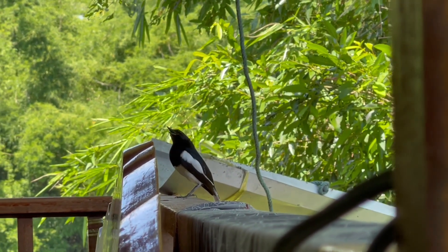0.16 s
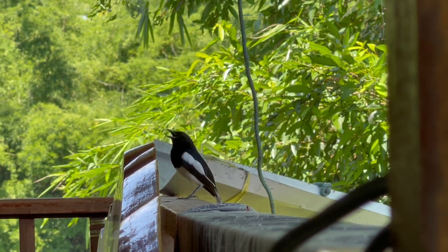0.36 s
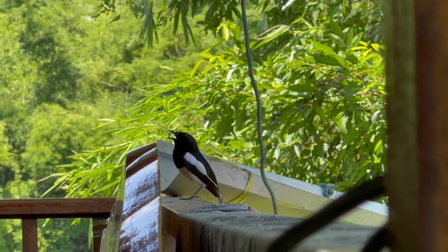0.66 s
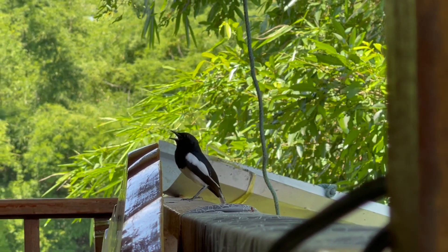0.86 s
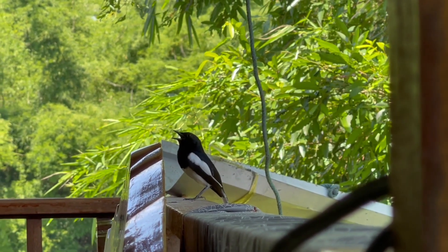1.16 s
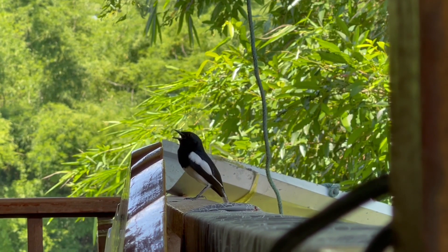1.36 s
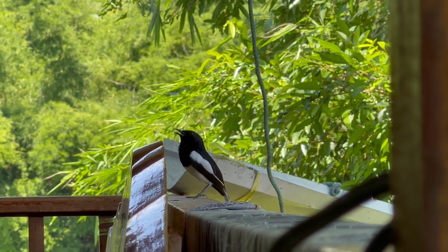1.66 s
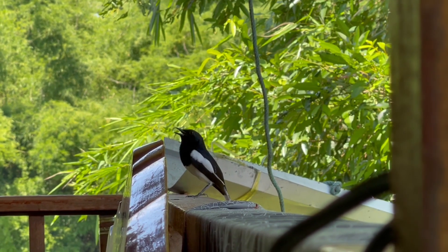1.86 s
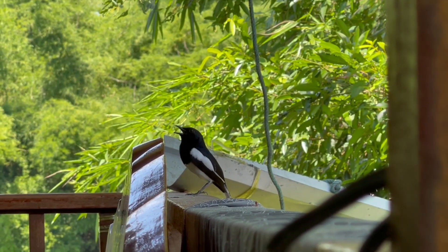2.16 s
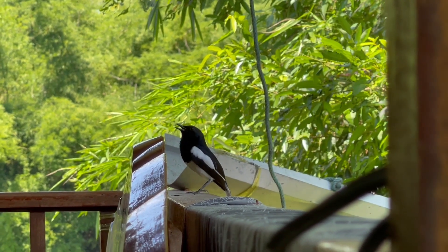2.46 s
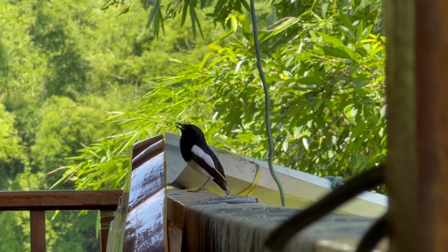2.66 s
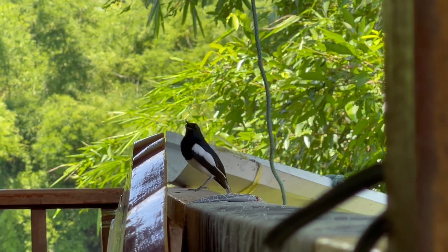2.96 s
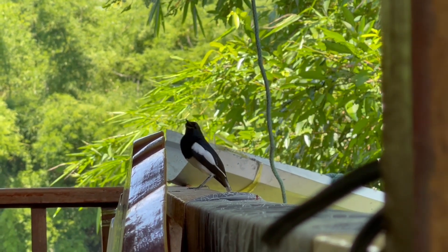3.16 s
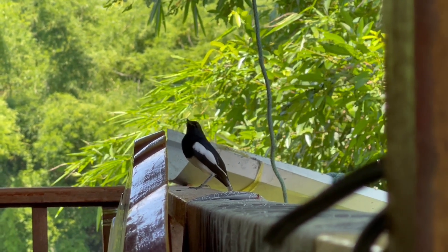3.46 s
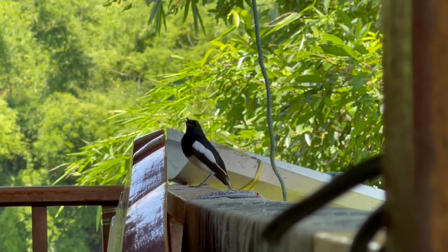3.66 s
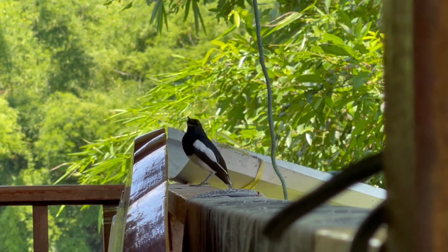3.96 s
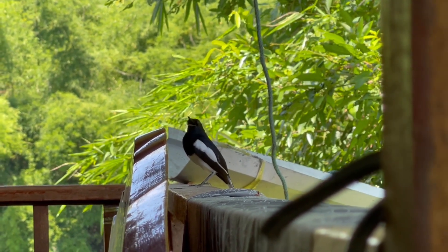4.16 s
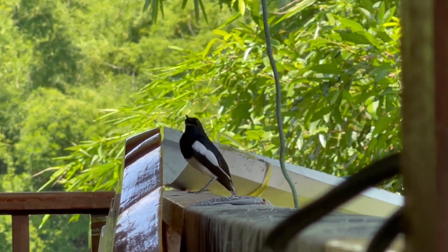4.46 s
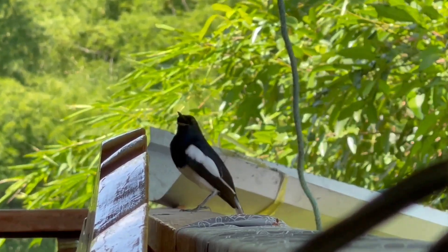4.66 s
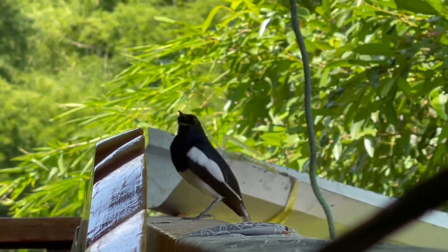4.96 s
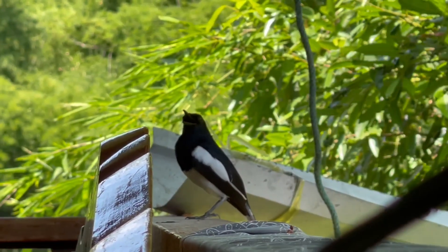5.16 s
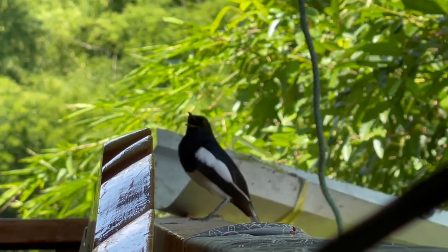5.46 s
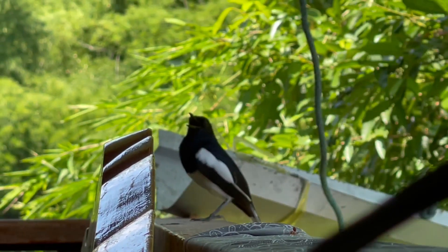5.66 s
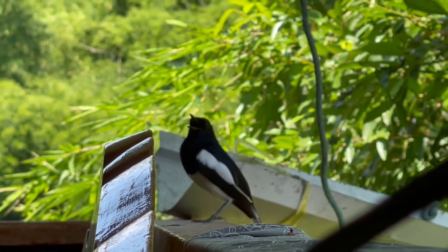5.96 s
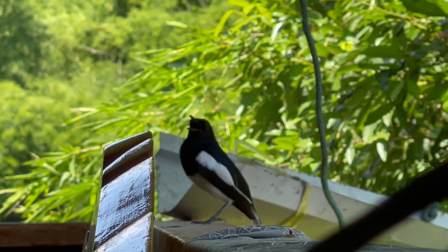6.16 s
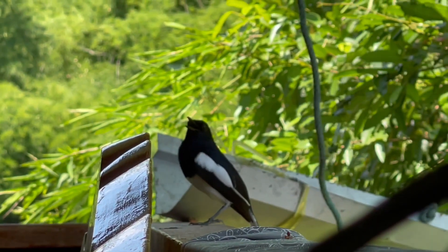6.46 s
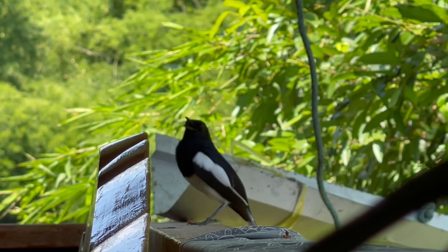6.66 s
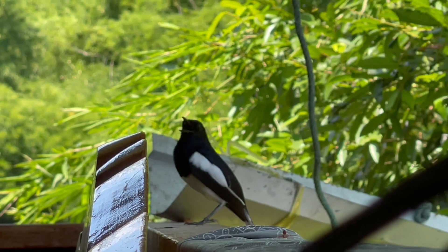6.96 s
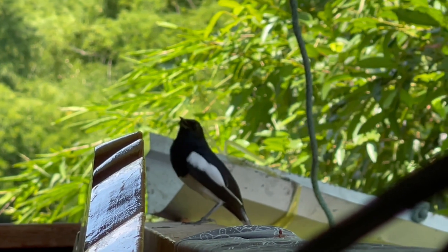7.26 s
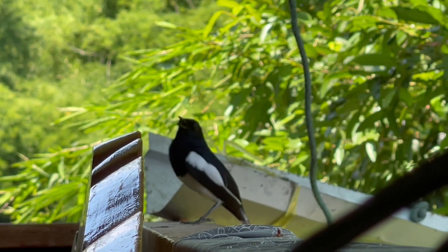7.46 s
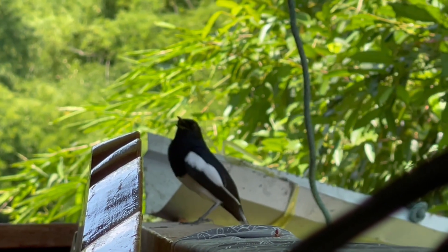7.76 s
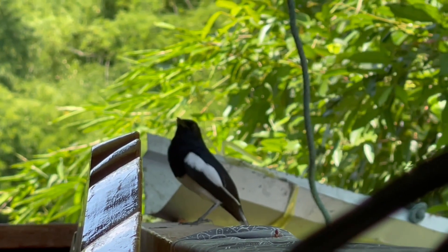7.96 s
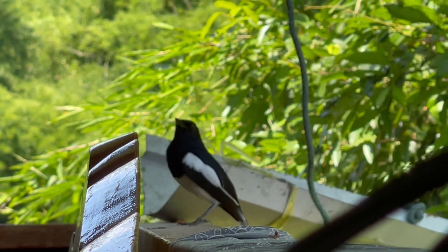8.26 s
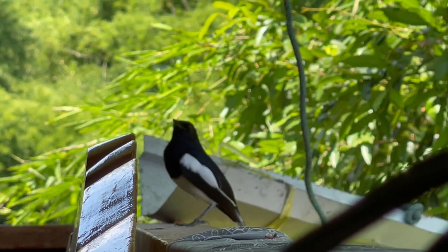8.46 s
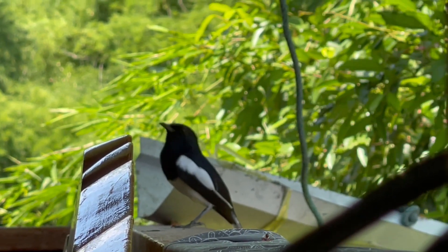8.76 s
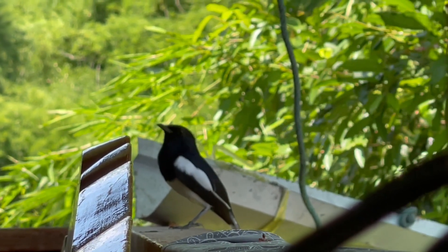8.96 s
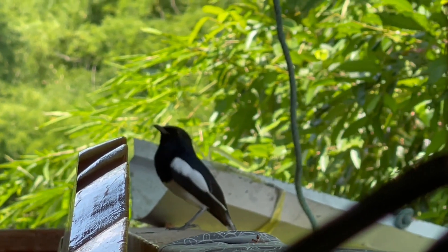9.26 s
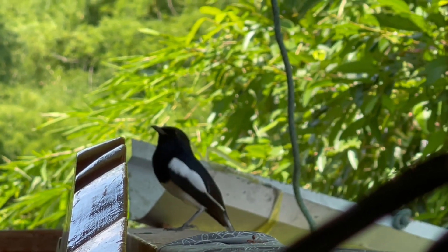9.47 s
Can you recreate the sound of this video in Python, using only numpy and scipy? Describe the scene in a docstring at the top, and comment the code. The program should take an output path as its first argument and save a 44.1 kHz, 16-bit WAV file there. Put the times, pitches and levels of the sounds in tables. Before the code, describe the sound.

Close outdoor songbird: two lively strings of clear high whistles, each about two seconds, separated by quiet air, far bird calls and small knocks.

```python
"""On a veranda rail at the forest's edge, a magpie-robin sings a phrase of ten kinds of note, then repeats it.
Each note is one gliding tone with weak overtones, here and there a rasp; boards and roof throw it back.
Far birds are noise-fluttered tones smeared by the trees, and knocks are short bursts of filtered noise.
Shaped noise makes the low rumble, rustle and thin hiss; a wavering sine makes the faint hum.
"""
import sys
import numpy as np
from scipy import signal
from scipy.fft import rfft, irfft
from scipy.io import wavfile
from scipy.ndimage import uniform_filter1d

SR = 44100
rng = np.random.default_rng(int(sys.argv[2]) if len(sys.argv) > 2 else 0)


def unload_audio(sound):
    """Save the sound as a 16-bit wav file, at the path given as the first command line argument."""
    columns = np.transpose(np.atleast_2d(sound))
    # keep every value between -1 and 1, then stretch to whole-number steps
    steps = np.round(np.clip(columns, -1, 1) * 32767)
    wavfile.write(sys.argv[1], SR, steps.astype(np.int16))


N = 423360
TIME = np.arange(N) / SR
FREQS = np.arange(N // 2 + 1) * SR / N

# outdoor air before the rustle and the lean to the left: (frequency [Hz], density [dB per Hz])
AIR_SPECTRUM = [(27, -110), (37, -77.5), (60, -78), (110, -83.5), (170, -86), (300, -96), (500, -100),
                (900, -102), (1600, -106), (3800, -108.5), (7300, -102), (9200, -105), (11500, -114),
                (12800, -138)]
# mains hum before the lean to the left: (time [s], level [dB])
HUM_LEVELS = [(0, -66), (5.3, -67.5), (6.1, -62.5), (9.6, -61.5)]
# soft knocks, brief rustles and a tick close by, as noise before its decay:
# (time [s], level [dB], centre [Hz], width [octaves], decay [s])
KNOCKS = [(.305, -58, 1070, 0.46, 0.019), (3.272, -43, 77.6, 1.43, 0.021), (3.272, -53, 464, .6, 0.0084),
          (3.959, -56, 477, 0.48, .015), (3.995, -63.5, 1600, 2.6, 0.1), (4.084, -63, 3200, 0.76, 0.031),
          (4.585, -66.5, 1810, 1.8, 0.12), (5.48, -68.5, 2400, 0.62, 0.18), (5.526, -52, 5000, 2.7, .005)]
# far bird chattering in pairs of falling buzzes: (time [s], first pitch [Hz], level of the first buzz [dB])
CHATTER_PAIRS = [(.01, 4240, -66.5), (.225, 4540, -65.5), (.46, 3820, -67), (.69, 4530, -64.5),
                 (.92, 3690, -68.5)]
# single calls in the forest, before the trees add their reflections:
# (time [s], length [s], first pitch [Hz], last pitch [Hz], level [dB], buzz [0-1])
FAR_CALLS = [(0.0, 0.5, 1744, 1699, -72.5, 0.27), (3.311, 0.063, 1426, 1363, -72, 0),
             (4.158, 0.096, 1987, 1826, -69.5, 0.16), (4.327, .02, 4120, 4320, -68, 0.4),
             (4.37, 0.023, 4150, 4700, -64, 0.3), (4.642, 0.076, 5600, 4440, -64, .7),
             (4.663, 0.054, 3750, 3330, -66, 0.75), (4.669, 0.084, 2436, 2320, -70.5, 0.7),
             (4.987, 0.072, 3580, 3260, -71, .28), (5.056, .13, 3007, 2593, -66, 0.98),
             (5.562, .1, 3440, 3440, -65, 0.07), (5.562, .098, 4650, 4560, -73, .1),
             (5.695, 0.076, 3515, 3480, -63, 0.26), (5.755, .17, 3260, 3090, -68.5, 0.16),
             (8.465, 0.053, 3600, 3820, -69.5, 0.33), (8.699, 0.23, 3250, 3250, -74, 0.1),
             (8.863, 0.09, 3420, 3140, -67, 0.05), (8.862, 0.085, 2540, 2310, -71.5, 0.3),
             (8.845, 0.13, 4430, 4510, -71.5, .1), (9.131, 0.078, 3930, 4650, -66, 1)]
# the bird's repertoire, one gesture for each kind of note, before the phrase reshapes it:
# name: (time into the note [s], pitch [Hz], level [dB], octave overtone relative to the tone [dB])
NOTE_GESTURES = { "fall": [(0, 4220, -53, -14), (.033, 4554, -43.5, -8.5), (.067, 4280, -38.5, -14.5),
                 (.106, 4043, -40, -20), (.128, 3965, -56, -13), (.161, 3926, -29.5, -23),
                 (.228, 3880, -36, -15), (.272, 3270, -44.5, -10.5), (.282, 3244, -43, -8)],
                 "upslur": [(0.0, 2575, -59.9, -17), (0.027, 2987, -41.6, -11.5),
                 (0.085, 3153, -39.8, -8.5), (0.102, 3347, -30.5, -26), (0.124, 3502.0, -39.5, -12),
                 (0.134, 3490, -34, -31.0)], "scoop": [(0.0, 2746, -53, -12), (0.027, 2847, -40, -8.5),
                 (0.045, 2950, -47, 1.5), (0.065, 3000, -38.5, -8.5), (0.085, 3475.0, -32, -22),
                 (0.098, 3575, -36, -20), (0.103, 3940, -45, -25)], "swoop": [(0, 5190, -46, -21),
                 (.02, 4774, -36, -9), (.04, 4637, -34, -5.5), (.069, 5214, -30.5, -3),
                 (.096, 5358, -31, 1), (.118, 5335, -29.5, -9), (.171, 5660, -32, -9.5),
                 (.186, 5244, -40, -17)], "warble": [(0, 2590, -58, -20), (.015, 2980, -42, -3.5),
                 (.032, 3170, -33.5, -16), (.056, 2816, -35.5, -16), (.068, 2981, -36.5, -16),
                 (.156, 2966, -39.5, -13), (.175, 3050, -37, -11), (.2, 2982, -37.5, -15.5),
                 (.21, 2650, -53, -15)], "burr": [(0.0, 3080, -39.5, -21), (0.016, 3493, -31.5, -16.5),
                 (0.035, 3274, -28, -22.0), (0.062, 3227, -28.5, -26.0), (0.069, 3106.0, -40, -15),
                 (0.1, 3199.0, -42.5, -11.5), (0.174, 3105.0, -33.5, -16.5), (0.192, 2900, -45.5, -4)],
                 "sag": [(0, 3245, -59, -25), (.016, 3423, -44, -30), (.039, 3324, -27, -22),
                 (.082, 3030, -38, -11.5), (.096, 3105, -37, -31.5), (.136, 2966, -39.5, -12.5),
                 (.151, 3000, -35.5, -26)], "whip": [(0, 5370, -49, -13), (.012, 5290, -48, -5),
                 (.019, 5156, -27, -34), (.028, 4815, -26, -14.5), (.043, 4460, -23, -16.5),
                 (.064, 4045, -26, -24), (.076, 2950, -50.5, -4)], "lift": [(0, 3500, -58, -27),
                 (.014, 3399, -44, -14.5), (.066, 3487, -34.5, -4), (.082, 3700, -31.5, -11),
                 (.098, 4070, -32, -25), (.111, 4187, -32, -17.5), (.119, 4100, -53, -21)],
                 "arch": [(0.0, 1785, -61.5, -8), (0.039, 2340, -36.5, -27), (0.052, 2430, -38.5, -17),
                 (0.073, 2540, -31.5, -23.5), (0.093, 2552, -29.5, -24), (0.101, 2457.0, -38.5, -23),
                 (0.111, 2340, -32.5, -18.5), (0.128, 2050.0, -51, -13)], }
# the phrase, sung twice, the second time without the burr:
# (start [s], note [name], length [factor], pitch [factor], level change [dB], overtone change [dB])
PHRASES = [ (1.076, "fall", .95, 1.002, -2, -1), (1.4241, "upslur", 1, 0.99, -1.5, -2),
           (1.5675, "scoop", 0.96, 1, -1.9, .5), (1.7729, "swoop", 0.95, 0.99, -1.5, -2),
           (2.0366, "warble", 1, .993, -1.4, 1.5), (2.321, "burr", 0.98, 1, -1.05, -0.1),
           (2.6143, "sag", 0.99, 1.001, -1.4, 2.5), (2.7778, "whip", .994, 1.004, -1.8, 2),
           (2.9323, "lift", .966, 1, 0.3, -0.5), (3.1418, "arch", 0.96, 1.016, -2.3, -1),
           (6.0073, "fall", .994, 1.002, 2.3, -2.5), (6.371, "upslur", 0.95, 0.98, .5, -3),
           (6.509, "scoop", 1.033, 1.003, 0.5, -3), (6.7208, "swoop", 0.93, 0.99, -0.4, -2.5),
           (6.9798, "warble", 1.02, 0.99, 0.7, -0.8), (7.2865, "sag", 1.01, .99, 0.2, -1),
           (7.455, "whip", 1, 0.99, -2.8, 1.5), (7.5934, "lift", 1.013, 0.99, 1.5, -4.5),
           (7.7848, "arch", 1, 1.004, -1.8, -3)]
# quick tremor on the level notes: (start [s], end [s], rate [Hz], pitch swing [share of pitch])
TREMORS = [(2.077, 2.205, 46.8, 0.014), (2.399, 2.49, 60.4, 0.015), (7.032, 7.146, 47.66, 0.017),
           (7.376, 7.42, 60.6, 0.0085)]
# how throat and open beak pass the third and fourth partials: (frequency [Hz], gain [dB])
BEAK_RESPONSE = [(6000, -12), (7600, 4), (9000, -4.5), (10500, 5.5), (11800, -12), (12700, -4),
                 (13400, -20), (15600, -25.5)]
# moments where the voice turns rough: (time [s], half length [s], added depth [factor])
RASPS = [(1.557, 0.0074, 0.28), (1.67, 0.016, 0.2), (2.425, 0.022, 0.83), (2.455, 0.022, 0.17),
         (2.704, 0.0074, 0.32), (2.786, 0.0051, 0.39), (6.499, 0.0047, 0.18), (7.117, 0.0059, 0.28),
         (7.391, 0.011, 0.29)]
# echoes from rail, gutter and roof: (delay [ms], gain [factor])
ECHOES = [(2.69, 0.21), (3.78, 0.17), (5.2, 0.05), (6.27, 0.21), (8.22, 0.51), (8.38, 0.23), (15.75, 0.043),
          (15.86, 0.19), (15.95, 0.26), (17.22, 0.14)]
# phase lead of the left microphone port over the right: (frequency [Hz], lead [radians])
PORT_LEAD = [(0, 0), (1900, 0), (2700, .6), (5000, .58), (7100, 0), (7700, .5), (8700, 0), (9400, -1.8),
             (10300, -3.1), (12000, -6.2), (16000, -12.6)]


def undb(db):
    """Decibels to gain."""
    return 10 ** (np.asarray(db) / 20)


def noise(gain):
    """Noise of rms 1 with the given gain at each frequency."""
    x = irfft(rfft(rng.standard_normal(N)) * gain, N)
    return x / x.std()


def wander(rate_hz):
    """Random motion of rms 1, mostly slower than the rate."""
    return noise(1 / (1 + (FREQS / rate_hz) ** 4))


def gate(t, start, end, edge):
    """Opens and closes smoothly around the two times."""
    opening = np.clip(np.minimum(t - start, end - t) / edge + .5, 0, 1)
    return np.sin(np.pi / 2 * opening) ** 2


def tail(t60, build_s):
    """Diffuse reflections of unit energy: noise that builds up and dies away exponentially."""
    t = TIME[:2 * SR]
    decay = np.exp(-np.log(1000) * t / t60)
    h = rng.standard_normal(len(t)) * decay * (1 - np.exp(-(t / build_s) ** 2))
    return h / np.sqrt(np.sum(h ** 2))


def reverberate(x, response):
    """The sound after a set of reflections."""
    return signal.fftconvolve(x, response)[:N]


def mains_hum(hum_hz=100, waver_hz=.23):
    """One sine whose pitch wavers slightly while its level drifts."""
    phase = 2 * np.pi * np.cumsum(hum_hz + waver_hz * wander(1.53)) / SR
    return np.sqrt(2) * undb(np.interp(TIME, *np.transpose(HUM_LEVELS))) * np.sin(phase)


def valley_rustle(air, rustle_db=2.05, ease_db_per_s=.36, stir_db=.7):
    """Change to the air's middle band as the valley rustle eases off steadily and stirs at random."""
    band = signal.butter(2, [300, 2500], "band", fs=SR, output="sos")
    middle = signal.sosfiltfilt(band, air)
    level_db = rustle_db - ease_db_per_s * TIME + stir_db * wander(12)
    return middle * (undb(level_db) - 1)  # minus the share already in the air


def background(bass_side_db=-17, mid_side_db=-8, treble_side_db=-12):
    """Shaped noise for rumble and hiss, mostly alike at both ports, with rustle and mains hum."""
    log_hz = np.log(FREQS + 1)
    hz, db = np.transpose(AIR_SPECTRUM)
    colour = undb(np.interp(log_hz, np.log(hz), db))
    side_db = [bass_side_db, mid_side_db, mid_side_db, treble_side_db]
    width = undb(np.interp(log_hz, np.log([80, 300, 2000, 6000]), side_db))
    # density per hertz summed to an rms level
    mid, side = (noise(g) * np.sqrt(np.sum(g ** 2) * SR / N) for g in (colour, colour * width))
    air = mid + np.array([side, -side])
    return air + valley_rustle(air) + mains_hum()


def knocks():
    """Bursts of band-shaped noise with a fast onset and exponential decay, softened at the top."""
    out = np.zeros(N)
    for s, db, hz, octaves, decay in KNOCKS:
        age = np.maximum(TIME - s, 0)
        band = np.exp(-(np.log2((FREQS + 1) / hz) / octaves) ** 2)
        envelope = np.exp(-age / decay) * (1 - np.exp(-age * hz))
        out += undb(db) * noise(band) * envelope
    return signal.sosfilt(signal.butter(6, 10500, fs=SR, output="sos"), out)


def chatter(buzz_s=.11, step_s=.061, fall=.093, rough=.704, second_ratio=.79, second_db=1):
    """Each call is a high buzz and a lower, louder one, both falling; rows as for the single calls."""
    calls = []
    for s, hz, db in CHATTER_PAIRS:
        for delay, ratio, lift_db in [(0, 1, 0), (step_s, second_ratio, second_db)]:
            first_hz = hz * ratio
            calls.append((s + delay, buzz_s, first_hz, first_hz * (1 - fall), db + lift_db, rough))
    return calls


def far_birds(t60=1.0, spread=0.2, flutter_share=.1226):
    """Gliding tones, buzzing where the pitch flutters, from the hillside and smeared by the trees."""
    out, flutter = np.zeros(N), wander(349)
    for s, length, first_hz, last_hz, db, buzz in chatter() + FAR_CALLS:
        span = slice(max(int(s * SR), 0), int((s + length) * SR))
        u = np.linspace(0, 1, len(TIME[span]))
        glide_hz = first_hz + (last_hz - first_hz) * u
        hz = glide_hz * (1 + flutter_share * buzz * flutter[span])
        tone = np.sin(2 * np.pi * np.cumsum(hz) / SR)
        out[span] += np.sqrt(2) * undb(db) * np.sin(np.pi * u) * tone
    side = spread * reverberate(out, tail(t60, .01))
    return out + reverberate(out, tail(t60, 0.0021)) + np.array([side, -side])


def veranda(x, near_db=-6.0, near_t60=.23, forest_db=-28, spread_db=-26):
    """Close echoes beat against the glides; the roof rings briefly and the trees answer faintly."""
    response = undb(near_db) * tail(near_t60, 0.003)
    response += undb(forest_db) * tail(.75, .04)
    response[0] += 1  # direct sound
    for ms, gain in ECHOES:
        response[int(ms * SR / 1000)] += gain
    side = undb(spread_db) * reverberate(x, tail(0.22, 0.0087))
    return reverberate(x, response) + np.array([side, -side])


def rasp(whistle, shake_hz=950, low_hz=2800, hiss_db=-14, rest_depth=.004):
    """Unsteady membranes shake the tone into sidebands and let some hiss through; the throat passes no lows."""
    depth = rest_depth + sum(peak * np.exp(-((TIME - s) / half) ** 2) for s, half, peak in RASPS)
    shaken = whistle * depth * (wander(shake_hz) + undb(hiss_db) * wander(6000))
    return irfft(rfft(shaken) * (1 - 1 / (1 + (FREQS / low_hz) ** 12)), N)


def song_tremor(unevenness=.8):
    """A quick, uneven swing that the throat lays over the level notes."""
    uneven = unevenness * wander(260)
    tremor = np.zeros(N)
    for start, end, rate_hz, swing in TREMORS:
        shake = np.sin(2 * np.pi * rate_hz * (TIME - start)) + uneven
        tremor += swing * gate(TIME, start, end, 0.022) * shake
    return tremor


def robin(third_db=-24, fourth_db=-35, song_db=0.47, edge_s=0.0028, press=0.99, throb=12):
    """The syrinx whistles each note from its repertoire; a pressed note is richer in all its overtones."""
    out = np.zeros(N)
    tremor = song_tremor()
    bend = tremor + .0022 * wander(120)  # share of pitch
    for start, name, stretch, transpose, note_db, rich_db in PHRASES:
        age, *columns = np.transpose(NOTE_GESTURES[name])
        s = start + stretch * age
        span = slice(int((s[0] - .02) * SR), int((s[-1] + .02) * SR))
        t = TIME[span]
        # muscles cannot turn a sharp corner
        hz, db, second_db = (uniform_filter1d(np.interp(t, s, c), size=160) for c in columns)
        hz, db, second_db = hz * transpose, db + note_db, second_db + rich_db
        phase = 2 * np.pi * np.cumsum(hz * (1 + bend[span])) / SR
        tone = np.sin(phase) + undb(second_db) * np.sin(2 * phase)
        for k, base_db in enumerate((third_db, fourth_db), start=3):
            beak_db = np.interp(k * hz, *np.transpose(BEAK_RESPONSE))
            partial_db = base_db + beak_db + press * (second_db + 17.5)
            tone += undb(partial_db) * np.sin(k * phase) * (k * hz < SR / 2)
        # the tremor moves pressure and pitch together
        pressure = undb(db + song_db) * (1 + throb * tremor[span])
        out[span] += np.sqrt(2) * tone * pressure * gate(t, s[0], s[-1], edge_s)
    return out


def scene(left_db=0.5):
    """The singer in front of the forest; the background leans a little to the left."""
    forest = background() * undb([[left_db], [-left_db]]) + knocks() + far_birds()
    whistle = robin()
    return forest + veranda(whistle + rasp(whistle))


def record(dry, top_hz=16000):
    """The two ports hear the treble out of step; a steep low-pass cuts the top."""
    lead = np.interp(FREQS, *np.transpose(PORT_LEAD))
    ports = irfft(rfft(dry) * np.exp(.5j * np.array([lead, -lead])), N)
    return signal.sosfilt(signal.ellip(8, .2, 70, top_hz, fs=SR, output="sos"), ports)


dry = scene()
out = record(dry)
unload_audio(out)
```